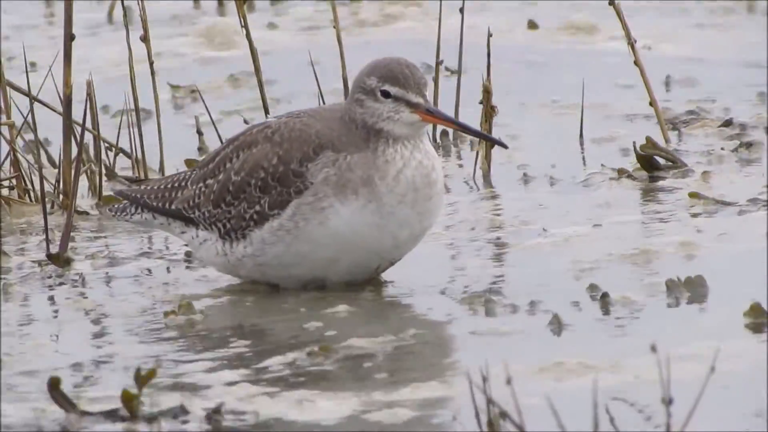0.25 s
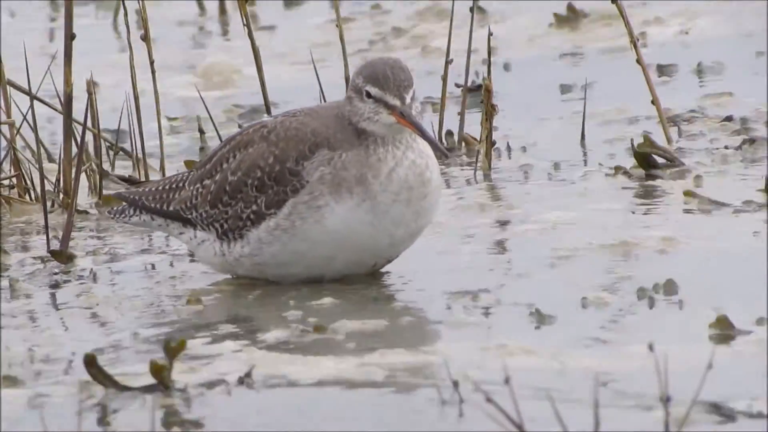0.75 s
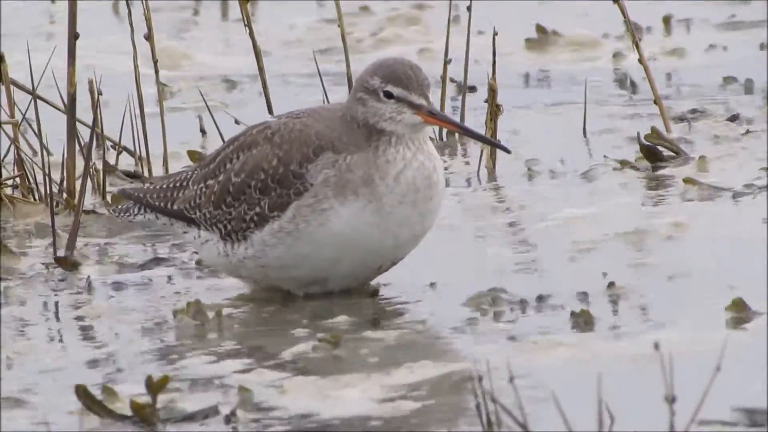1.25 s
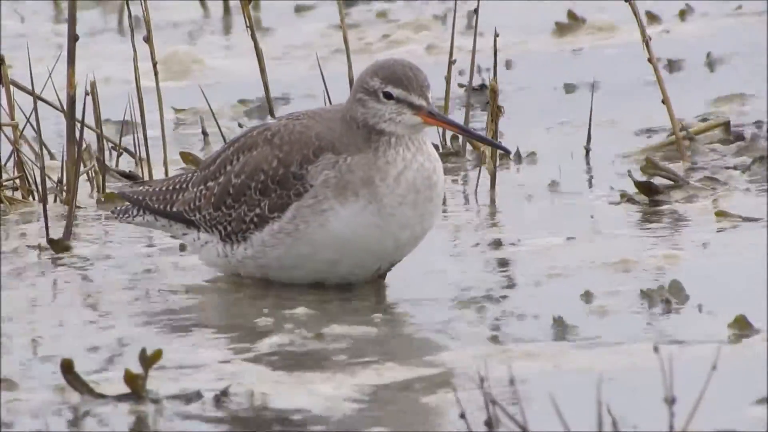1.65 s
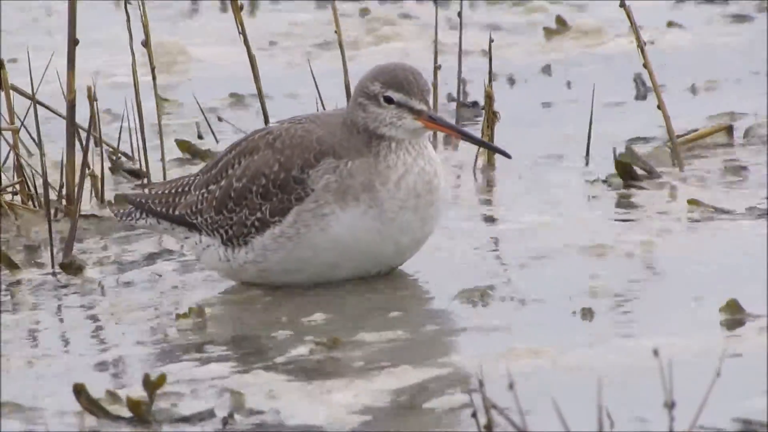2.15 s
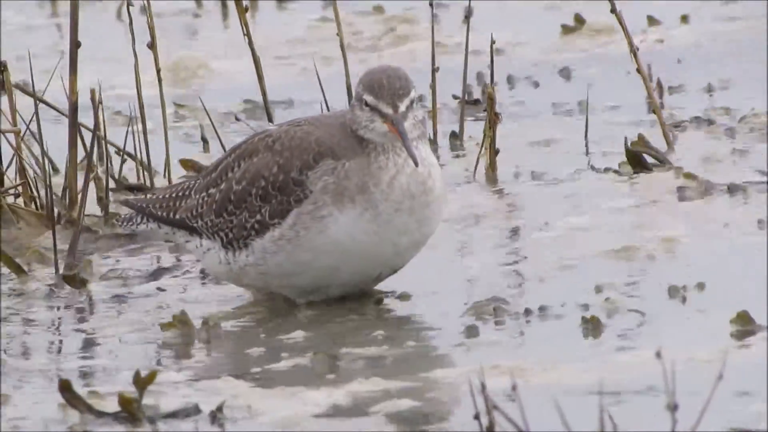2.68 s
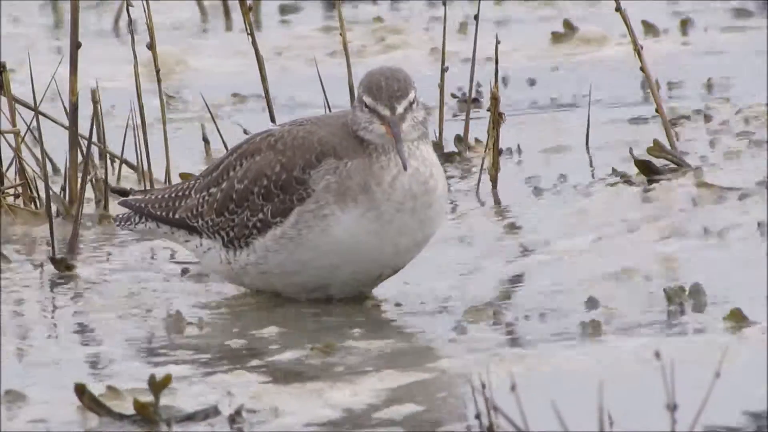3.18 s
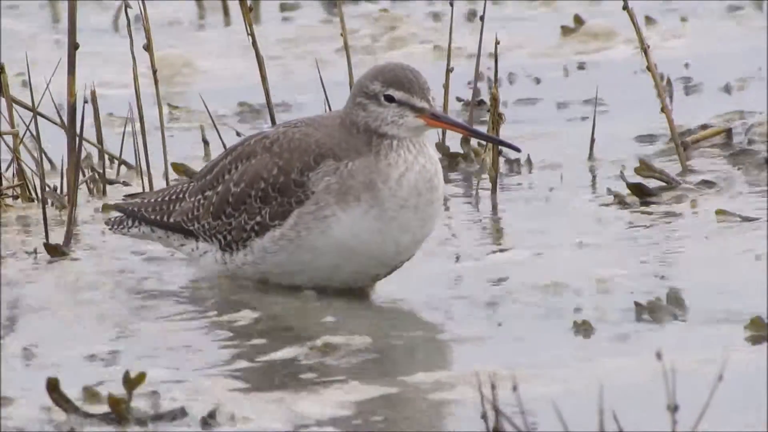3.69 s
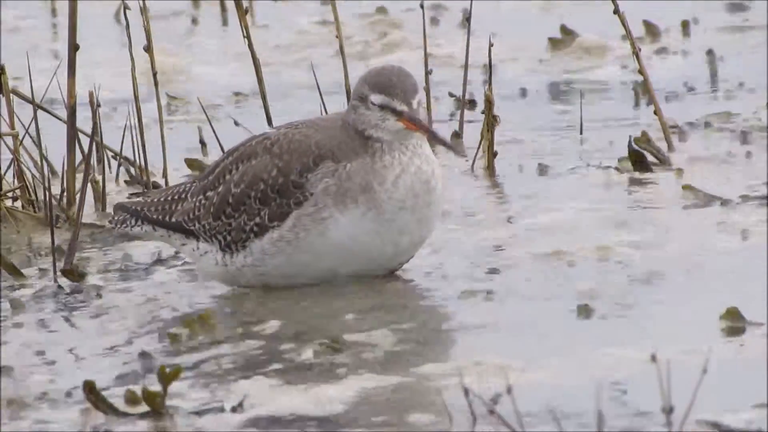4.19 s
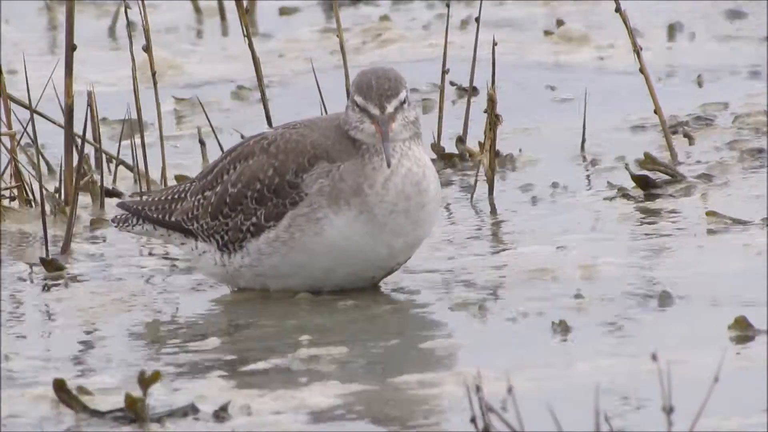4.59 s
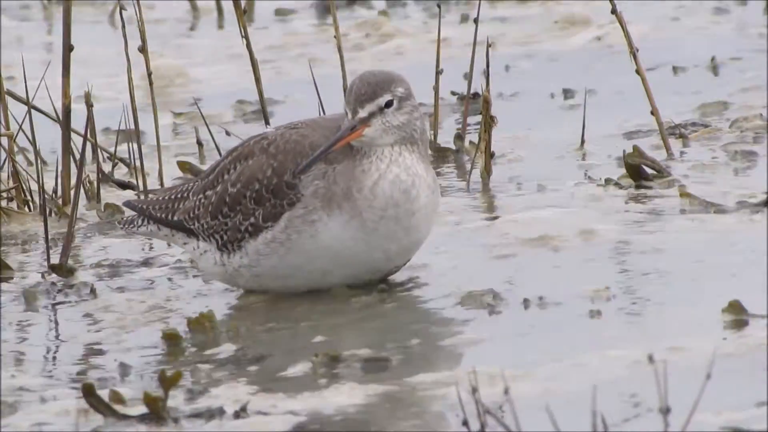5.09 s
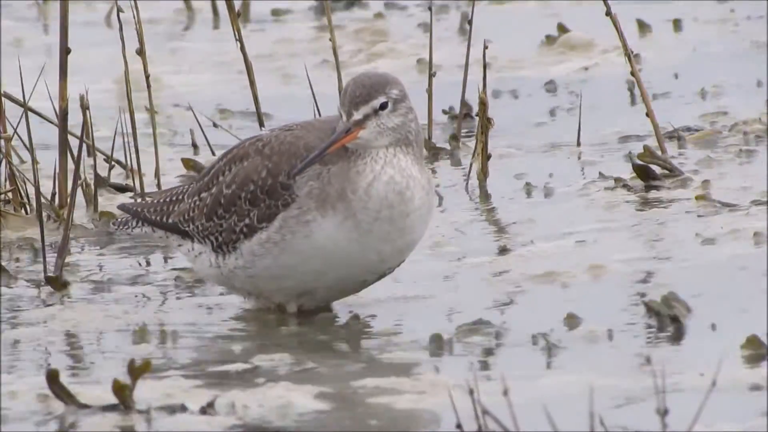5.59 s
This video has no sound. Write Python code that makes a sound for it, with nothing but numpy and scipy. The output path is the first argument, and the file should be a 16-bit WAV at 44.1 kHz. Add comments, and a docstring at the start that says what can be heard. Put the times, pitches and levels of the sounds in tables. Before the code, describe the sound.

A wading bird gives a harsh, rattling call again and again on a mudflat while wind rumbles and thumps against the microphone.

```python
"""Wind rumbles and buffets the two ports of the microphone, over faint hiss and a thin electronic whine.
A little to the right a shore bird repeats a harsh call over a mudflat; water drips now and then.
Each call starts as a thin rising note and breaks upward into a rattle, chopped 80 to 105 times a second.
Wind, hiss and turbulence are shaped noise; the voice is pulses through resonances; drips are gliding rings."""
import sys
import numpy as np
from scipy import signal
from scipy.fft import rfft, irfft
from scipy.io import wavfile
from scipy.ndimage import uniform_filter1d

SR = 44100
rng = np.random.default_rng(int(sys.argv[2]) if len(sys.argv) > 2 else 0)


def materialize(psi):
    """Save the field psi as 16-bit PCM at rate SR to the path in sys.argv[1].

    A 1-D psi becomes a single channel; in a 2-D psi each row is a channel.
    """
    bounded = np.clip(np.atleast_2d(psi).T, -1, 1)
    quanta = np.round(bounded * 32767).astype(np.int16)
    wavfile.write(sys.argv[1], SR, quanta)


N = 257536
TIME = np.arange(N) / SR

# wind strength at the microphone, before the trims in wind(): time_s, rumble_db, churn_db
GUSTS = [(0.0, -32.5, -37.5), (0.16, -44.5, -42.5), (0.37, -36, -43), (0.65, -29, -34), (0.86, -32, -44.5),
         (1.3, -38.5, -42.5), (1.89, -35.5, -41.5), (2.21, -37, -44), (2.78, -32.5, -36),
         (3.07, -30.5, -40), (3.25, -40, -39), (3.59, -34.5, -41), (4.08, -38, -44), (4.55, -34, -40.5),
         (4.86, -30.5, -41.5), (5.38, -33, -29), (5.63, -42, -37), (5.84, -37, -52)]
# spectrum of the large eddies: frequency_hz, density_db (per Hz)
RUMBLE_COLOUR = [(20, -59), (40, -9), (75, 1.5), (130, 1), (200, -6), (300, -21.5), (500, -50), (900, -53),
                 (2000, -55), (8000, -85)]
# spectrum of the small eddies at each port: frequency_hz, density_db (per Hz)
CHURN_COLOUR = [(30, -36), (80, -46), (180, 5), (280, 4.5), (450, -7), (700, -28), (1200, -40), (3000, -55),
                (8000, -81)]
# spectrum of the open-air hiss: frequency_hz, density_db (per Hz)
AIR_COLOUR = [(290, -42), (500, -4), (629, -6), (1040, -10), (1120, -15.5), (1180, -11.5), (3060, -23),
              (4570, -24.5), (14800, -31), (15500, -43)]
# the bird's calls, one a row: start_s, break_s (into the rattle), end_s, break_pitch_hz, top_pitch_hz,
# climb_s, fall_s, early_rattle_rate_hz, late_rattle_rate_hz, opening_db, rattle_db, rattle_fade_db,
# early_upper_db, late_upper_db (upper resonances), early_rasp, middle_rasp, late_rasp (0-1)
CALLS = [(0.119, 0.137, 0.552, 722, 1000, 0.025, 0.024, 104.7, 86, -51, -41.5, 2.5, 2, -12, .9, 0.78, 0.47),
         (0.762, 0.847, 1.178, 748, 1047, 0.025, 0.018, 90.44, 85.4, -48, -35.5, -3.5, -8, -6, 0.45, .12, 0.65),
         (1.34, 1.428, 1.645, 685, 1040, .012, 0.019, 83.7, 84, -51, -42, 0.5, 1, -1, 0.53, 0.086, 0.83),
         (1.833, 1.919, 2.158, 668, 1050, .04, 0.023, 83.16, 82.8, -52.5, -42.5, -3, -1, 3, 0.59, 0.34, 0.83),
         (2.349, 2.433, 2.69, 672, 1037, 0.027, .021, 85.1, 85.8, -52.5, -43.5, -1.5, 1, 2, 0.69, 0.3, 0.77),
         (2.873, 2.917, 3.232, 756, 1069, 0.026, 0.03, 88.2, 86.8, -55, -40, -0.5, -4, -11.5, 0.44, 0.13, 0.46),
         (3.448, 3.465, 3.85, 745, 1000, 0.019, 0.023, 102.6, 87.6, -54, -44.5, 4.5, -2, -10.5, 0.99, 0.77, 0.44),
         (4.073, 4.115, 4.468, 745.6, 1044, 0.06, .013, 93, 82.6, -49, -33.5, -16.5, -8, -6.5, 0.5, 0.246, 0.794),
         (4.634, 4.745, 4.96, 701.5, 976, .013, .02, 82, 82.2, -60, -46.5, -3.5, -6, -3, 0.45, 0.46, 0.52),
         (5.201, 5.321, 5.522, 696, 965, 0.0069, .036, 82, 80.6, -57, -47, -5, -3, -3, .3, 0.262, 0.31),
         (5.725, 5.829, 6.05, 654, 965, 0.018, .03, 83.4, 82.7, -57, -38, -3, -4, 2, .3, .3, .4)]
# throat resonances, lowest, main, then six upper ones: frequency_hz, width_hz
THROAT = [(1220, 1650), (1990, 803), (2960, 774), (4250, 1510), (5130, 550), (6030, 820), (7350, 510),
          (8600, 3600)]
# throat posture, one row a call: lowest_db (against the main resonance), then the balance
# of the upper six: upper1_db, upper2_db, upper3_db, upper4_db, upper5_db, upper6_db
POSTURES = [(-11.5, 1, 2, 1, 0, -16, -14.5), (-34, 4.5, 1, 2, -6, -22, -23.5),
            (-11.5, 4, -2.5, 1, -9.5, -15, -24.5), (-13, 8, -0.5, -2.5, -20, -11, -26),
            (-9.5, 8, 0.5, -4.5, -25, -9, -28), (-30, 2, 0, -6, -8, -26, -43),
            (-14.5, -3.5, -3, -6, -7.5, -31, -23), (-12.5, 2, -2.5, -5.5, -10.5, -29, -28),
            (-6, 15, 1, -32, -36, -38, -28), (-4.5, 10.5, -0.5, -24, -38, -40, -38),
            (-6, 2, -6, -18, -25, -32, -31)]
# hardest eddies to strike the microphone: peak_s, level_db (before trim), pitch_hz, left_minus_right_db
BUFFETS = [(0.144, -12.5, 306, -3), (0.216, -19, 274, -1), (0.36, -18.5, 129, 4.5), (0.379, -20, 120, 1),
           (0.499, -13, 108, 3), (0.528, -22.5, 314, 4), (0.636, -19, 153, -2), (0.657, -12.5, 236, 3.5),
           (0.687, -19, 189, 4), (1.111, -19, 175, 5), (1.49, -22, 93, 1), (1.615, -17, 144, 5),
           (1.804, -13, 292, -12), (1.818, -16.5, 218, 10), (1.858, -26.5, 272, 23), (1.867, -8.5, 312, 1),
           (1.976, -14, 207, -2.5), (2.009, -13.5, 187, -1), (2.209, -21.5, 110, 0),
           (2.329, -17.5, 190, -1), (2.485, -16.5, 175, 0), (2.588, -17, 260, 4), (2.615, -14.5, 202, -4),
           (2.796, -17, 207, 6), (2.914, -13, 168, 1), (2.948, -11, 160, -2), (2.968, -8.5, 234, -1),
           (2.983, -13.5, 238, 8), (2.991, -3, 220, 3.5), (3.005, -16, 249, 5), (3.027, -18.5, 270, 4),
           (3.124, -11, 250, 1), (3.24, -23, 300, 6), (3.264, -15, 223.5, -3.5), (3.287, -24, 270, 9),
           (3.348, -42, 375, -13), (3.45, -18, 239, -6.5), (3.485, -22.5, 110, 0), (3.686, -12, 146, -1),
           (3.798, -14.5, 158, -1), (3.832, -12.5, 180, 2), (3.88, -24, 171, -1), (4.102, -19, 220, 1),
           (4.199, -23, 139, -7), (4.429, -22, 190, 3), (4.475, -20, 286, -8), (4.525, -13, 278, -5),
           (4.544, -9, 358, 12.5), (4.56, -13.5, 109, -3), (4.597, -15.5, 169, -2), (4.659, -12.5, 116, -2),
           (4.703, -12.5, 215, -2.5), (4.729, -9, 250, 0), (4.965, -20, 254, -12.5),
           (4.98, -16.5, 208, 6.5), (5.08, -11, 153, 0), (5.126, -22.5, 289, 4), (5.154, -17, 234, -0.5),
           (5.238, -16.5, 200, -2), (5.271, -18, 290, 3), (5.343, -14.5, 200, -1), (5.414, -11.5, 245, 3),
           (5.477, -11, 263, -9), (5.496, -17.5, 188, 2.5), (5.596, -15.5, 125, 0), (5.772, -26.5, 82, -3)]
# spectrum of the turbulence each eddy drags: frequency_hz, density_db (per Hz)
WAKE_COLOUR = [(60, -3), (250, 10.5), (550, -4.5), (900, -29.0), (1800, -50), (9000, -63)]
# drips: start_s, start_pitch_hz, glide_hz_per_s, level_db (before onset and decay), t60_s
DRIPS = [(2.147, 1140, 4000, -40.5, 0.041), (2.702, 975, 20600, -28, 0.055), (4.346, 1195, 8000, -28, 0.02)]

AIR_DB, WHINE_HZ = -59, 15734
OPENING_RISE_HZ_PER_S, OPENING_SWELL_DB_PER_S = 1300, 39
OPENING_CLEAN_HZ, OPENING_HOARSE_HZ = 638.5, 870  # the higher the opening note is forced, the hoarser it is
OPENING_BRIGHT_DB, CLIMB_DB = 1.5, -5  # its upper resonances stand out; the rattle swells as it climbs
BREAK_S = 0.0135  # time scale of the voice's jump into the rattle
CLIMB_SHARE, FALL_SHARE = 0.11, 0.33  # how far under its top pitch the rattle begins and ends
ATTACK_S, ATTACK_DULL_DB = 0.016, -20  # the upper resonances come in late
RELEASE_DB, RELEASE_S, RELEASE_DULL_DB = -24.5, 0.022, -3.5
RASP_MIDDLE_SHARE, RASP_LATE_SHARE = 0.493, 0.88  # places within the rattle
TOP_HZ, CEILING = 15950, 1.6  # recorder's upper limit; microphone's soft limit of amplitude


def undb(db):
    """Decibels to gain."""
    return 10 ** (np.asarray(db) / 20)


def unit(x):
    """Scale to rms 1."""
    return x / np.sqrt(np.mean(x ** 2))


def walk(rate, count):
    """Smooth random wander of spread 1 that turns about rate times a second."""
    step = max(int(SR / rate), 1)
    held = np.repeat(rng.standard_normal(count // step + 1), step)
    return unit(uniform_filter1d(held, step)[:count])


def tinted(points):
    """Noise with a spectrum of (Hz, dB) points, rms 1."""
    hz, db = np.transpose(points)
    bins_hz = np.fft.rfftfreq(N, 1 / SR)
    gain = undb(np.interp(np.log(bins_hz + 1), np.log(hz), db))
    return unit(irfft(rfft(rng.standard_normal(N)) * gain, N))


def add(track, start_s, sound):
    """Mix a sound into a track at a time."""
    first = max(int(start_s * SR), 0)
    part = sound[:max(N - first, 0)]
    track[first:first + len(part)] += part


def gust(t):
    """Levels of the rumble and of the churn at these times, dB before trim."""
    s, *levels = np.transpose(GUSTS)
    return [np.interp(t, s, db) for db in levels]


def wind(rumble_db=2, churn_db=-3.5, flicker_db=3.5, burst_db=1.5, apart_hz=170, side_db=-3, billow_db=0.1,
         swell_db=-22, swell_s=0.017, swell_slope=0.48, swell_hz=200):
    """Turbulence: large eddies rumble across both ports and swell at each buffet; small ones churn at each alone."""
    rumble_db_now, churn_db_now = gust(TIME)
    swells = np.zeros(N)  # power
    t = np.arange(-(SR // 10), SR // 10) / SR
    hardest_db = max(row[1] for row in BUFFETS)
    for s, db, hz, _ in BUFFETS:
        size = undb(swell_slope * (db - hardest_db)) * np.sqrt(swell_hz / hz)  # slower eddies are larger
        add(swells, s + t[0], size ** 2 * np.exp(-(t / swell_s) ** 2))
    billows = undb(rumble_db + rumble_db_now) * unit(undb(billow_db * walk(12, N)))
    rumble_level = np.sqrt(billows ** 2 + undb(swell_db) ** 2 * swells)

    # the ports differ only above the lowest rumble
    high_pass = signal.butter(2, apart_hz, "high", fs=SR, output="sos")
    side = undb(side_db) * signal.sosfilt(high_pass, tinted(RUMBLE_COLOUR))
    rumble = tinted(RUMBLE_COLOUR) + side * np.array([[1], [-1]])
    rumble = rumble * unit(undb(flicker_db * walk(45, N)))

    churn = np.array([tinted(CHURN_COLOUR) for _ in range(2)])
    churn = churn * unit(undb(burst_db * walk(70, N)))
    return rumble_level * rumble + undb(churn_db + churn_db_now) * churn


def air(side_db=-0.5, whine_db=-72):
    """Smooth open-air hiss, wide across the ports, and the thin steady sine whine of the electronics."""
    side = undb(side_db) * tinted(AIR_COLOUR) * np.array([[1], [-1]])
    hiss = undb(AIR_DB + 0.5 * walk(1.9, N)) * (tinted(AIR_COLOUR) + side)
    return hiss + undb(whine_db) * unit(np.sin(2 * np.pi * WHINE_HZ * TIME))


def gesture(row):
    """Course of one call: a soft rising note, a jump, then an arch that climbs, holds and falls away."""
    (start, break_s, end, break_hz, top_hz, climb_s, fall_s, early_hz, late_hz,
     opening_db, rattle_db, fade_db, early_db, late_db, *rasps) = row
    t = TIME[(TIME >= start) & (TIME <= end)]
    since_break, to_end = t - break_s, end - t
    age = np.maximum(since_break, 0)
    progress = age / (end - break_s)
    broken = (1 + np.tanh(since_break / BREAK_S)) / 2

    def blend(opening, rattle):
        """Cross from the opening note to the rattle at the break."""
        return opening + broken * (rattle - opening)

    attack, release = np.exp(-(t - start) / ATTACK_S), np.exp(-to_end / RELEASE_S)
    climb = np.exp(-age / climb_s)
    arch = 1 - CLIMB_SHARE * climb - FALL_SHARE * np.exp(-to_end / fall_s)
    hz = blend(break_hz + OPENING_RISE_HZ_PER_S * since_break, top_hz * arch)
    rate = early_hz + (late_hz - early_hz) * progress

    opening_level_db = opening_db + OPENING_SWELL_DB_PER_S * since_break
    rattle_level_db = rattle_db + fade_db * progress + CLIMB_DB * climb
    level_db = blend(opening_level_db, rattle_level_db) + RELEASE_DB * release
    upper_db = early_db + blend(OPENING_BRIGHT_DB, (late_db - early_db) * progress)
    upper_db = upper_db + ATTACK_DULL_DB * attack + RELEASE_DULL_DB * release

    hoarse = np.interp(break_hz, [OPENING_CLEAN_HZ, OPENING_HOARSE_HZ], [0, 1])
    rattle_rasp = np.interp(progress, [0, RASP_MIDDLE_SHARE, RASP_LATE_SHARE], rasps)
    rasp = np.clip(blend(hoarse, rattle_rasp), 0, 1)
    return t, hz, rate, level_db, upper_db, rasp


def pulse_train(hz, odd=0.77, dulling_db=0.0):
    """Sharp pulses at a moving pitch; odd scales the odd lines, dulling takes dB off each higher line."""
    phase = 2 * np.pi * np.cumsum(hz) / SR
    return sum(np.cos(k * phase) * (odd if k % 2 else 1) * undb(-dulling_db * k) for k in range(1, 14))


def resonate(x, modes, gains_db, size=2048):
    """Pass through steep resonances (Hz, width) as one causal minimum-phase filter, weak below 700 Hz."""
    f = np.fft.rfftfreq(size, 1 / SR)
    power = sum(undb(db) ** 2 / (1 + (2 * (f - hz) / width) ** 2) ** 2
                for (hz, width), db in zip(modes, gains_db))
    bass_cut = (f / SR + 1e-6) ** 2 / ((f / SR) ** 2 + (700 / SR) ** 2)
    # folding the cepstrum onto positive times makes the filter causal
    cepstrum = irfft(np.log(power * bass_cut) / 2)
    cepstrum[1:size // 2] *= 2
    cepstrum[size // 2 + 1:] = 0
    return signal.fftconvolve(x, irfft(np.exp(rfft(cepstrum))))[:len(x)]


def steady(x):
    """Even out slow changes of level, leaving the rattle."""
    power = uniform_filter1d(uniform_filter1d(x ** 2, size=1050), size=530)
    return x / np.sqrt(power + 1e-12)


def call(row, posture, sag=0.0397, rasp_sag=0.36, jitter=0.0061, rasp_jitter=0.06, gap_jitter=0.0885,
         closing=0.69, odd_db=-1.5, thin_db=2.0, second_ratio=0.615, second_db=3, second_sag=0.074,
         second_jitter=0.0419, hiss_db=-23, rasp_hiss_db=-15):
    """A pulsing syrinx; high or raspy notes are chopped by a slow flap, and pitch bends and scatters at gaps."""
    t, hz, rate, level_db, upper_db, rasp = gesture(row)
    count = len(t)
    rattle = np.clip((hz - 690) / 110 + rasp, 0, 1)
    flap_wander = (0.00753 + 0.0275 * rasp) * walk(60.2, count)
    flap = np.cumsum(rate * (1 + flap_wander)) / SR  # cycles
    gap = rattle * np.abs(np.cos(np.pi * flap)) ** 4.1

    # each burst starts flat and flicks sharp as the flap shuts
    droop = gap ** 2 * (0.23 + 2 * np.sin(2 * np.pi * flap))
    scatter = (jitter + rasp_jitter * rasp ** 2 + gap_jitter * gap ** 2) * walk(1100, count)
    scatter = scatter + 0.02863 * rasp * walk(89.95, count)
    pitch = hz * (1 - (sag + rasp_sag * rasp) * droop + scatter)

    # the thin opening note is duller, and a pulse halfway through each cycle weakens its odd lines
    pulses = pulse_train(pitch, undb(odd_db * (4.5 - rattle)), thin_db * (1 - rattle))
    # in a rasp the other side of the syrinx joins in at a lower, unsteady pitch
    second_bend = 1 - second_sag * droop + second_jitter * walk(700, count)
    second = pulse_train(hz * second_ratio * second_bend)

    opening = 1 - closing * gap
    breath = np.pi * rng.standard_normal(count) * opening
    voiced = pulses + undb(second_db) * rasp ** 2 * second
    source = voiced * opening + undb(hiss_db) * breath
    main = steady(resonate(source, THROAT[:2], [posture[0], 0]))
    # forced air roughens the upper resonances most
    rough_source = source + undb(rasp_hiss_db) * rasp * breath
    upper = steady(resonate(rough_source, THROAT[2:], posture[1:]))
    fade = np.clip(np.minimum(t - t[0], t[-1] - t) / 0.0084, 0, 1)
    return (main + upper * undb(upper_db)) * undb(level_db) * fade


def bird(pan_db=-1.6, port_lag_s=1.3e-5, near_db=-21, near_t60=0.12, far_db=-29, far_t60=0.45):
    """The calls, a little to the right, scattered by the reeds nearby and faintly by the far shore."""
    voice = np.zeros(N)
    for row, posture in zip(CALLS, POSTURES):
        add(voice, row[0], call(row, posture))
    # sound reaches the left port slightly later
    delay = np.exp(-2j * np.pi * np.fft.rfftfreq(N, 1 / SR) * port_lag_s)
    left = irfft(rfft(voice) * delay, N)
    out = np.array([left, voice]) * undb([[pan_db / 2], [-pan_db / 2]])
    t = TIME[:SR // 2]
    for db, t60 in ((near_db, near_t60), (far_db, far_t60)):
        tails = rng.standard_normal((2, len(t))) * np.exp(-np.log(1000) * t / t60)
        echoes = [signal.fftconvolve(voice, tail / np.linalg.norm(tail))[:N] for tail in tails]
        out = out + undb(db) * np.array(echoes)
    return out


def small_eddies(count=24, over_churn_db=14, spread_db=-1.0, centre_hz=190, spread_octaves=0.34, pan_db=4):
    """Weak eddies that come at random, harder in a gust; rows like those of BUFFETS."""
    s = (np.arange(count) + rng.random(count)) / count * N / SR
    size, pitch, side = rng.standard_normal((count, 3)).T
    level_db = gust(s)[1] + over_churn_db + spread_db * size
    pitch_hz = centre_hz * 2 ** (spread_octaves * pitch)
    return list(zip(s, level_db, pitch_hz, pan_db * side))


def buffets(gain_db=1.0, rise_cycles=0.57, slowing=0.54, port_lag_s=0.00084, grit_db=-22, wake_db=-21,
            wake_s=0.0058):
    """Each eddy is a pressure swing that slows as it dies, reaches the right port later and drags a wake."""
    out = np.zeros((2, N))
    t = TIME[:SR // 8]
    wake = undb(wake_db) * t / wake_s * np.exp(1 - t / wake_s)
    turbulence = [tinted(WAKE_COLOUR) for _ in out]
    for s, db, hz, pan_db in BUFFETS + small_eddies():
        peak_s = rise_cycles / hz
        age = t / peak_s
        swell = (age * np.exp(1 - age)) ** 2.82
        turns = np.cumsum(hz * (1 + slowing * (2 * 0.5 ** age - 1))) / SR
        swing = swell * np.sin(2 * np.pi * (turns + rng.random()))
        for track, noise, side in zip(out, turbulence, (1, -1)):  # left, right
            noise_now = np.take(noise, int(s * SR) + np.arange(len(t)), mode="wrap")
            grit = noise_now * (undb(grit_db) * swell + wake)
            level = undb(db + gain_db + side * pan_db / 2)
            add(track, s - peak_s - side * port_lag_s / 2, level * (swing + grit))
    return out


def drips(rise_s=0.0053):
    """Each drop traps a bubble whose ring glides upward."""
    out = np.zeros(N)
    t = TIME[:SR // 10]
    for s, hz, glide, db, t60 in DRIPS:
        ring = np.sin(2 * np.pi * (hz * t + glide * t ** 2 / 2))
        envelope = (1 - np.exp(-t / rise_s)) * np.exp(-np.log(1000) * t / t60)
        add(out, s, undb(db) * ring * envelope)
    return out


def scene():
    """Weather, bird and water together at the microphone."""
    return wind() + air() + bird() + buffets() + drips()


def record(dry, low_cut_hz=38):
    """The microphone sheds the deepest bass and rounds the hardest buffets; the recorder cuts the top."""
    sound = signal.sosfilt(signal.butter(2, low_cut_hz, "high", fs=SR, output="sos"), dry)
    sound = CEILING * np.tanh(sound / CEILING)
    return signal.sosfilt(signal.ellip(10, 0.2, 80, TOP_HZ, fs=SR, output="sos"), sound)


dry = scene()
out = record(dry)
materialize(out)
```